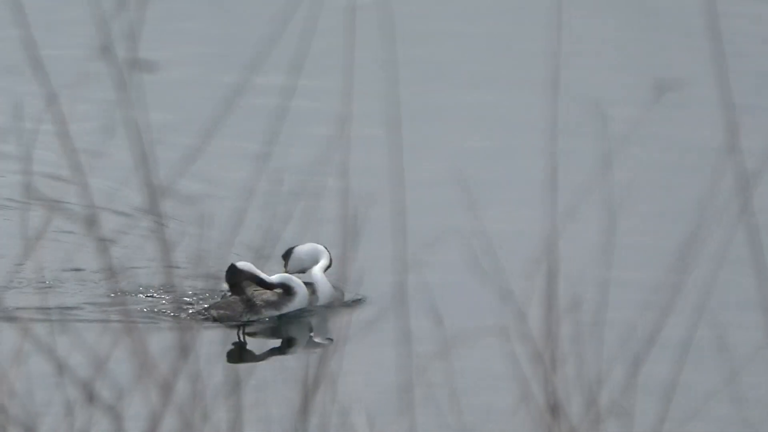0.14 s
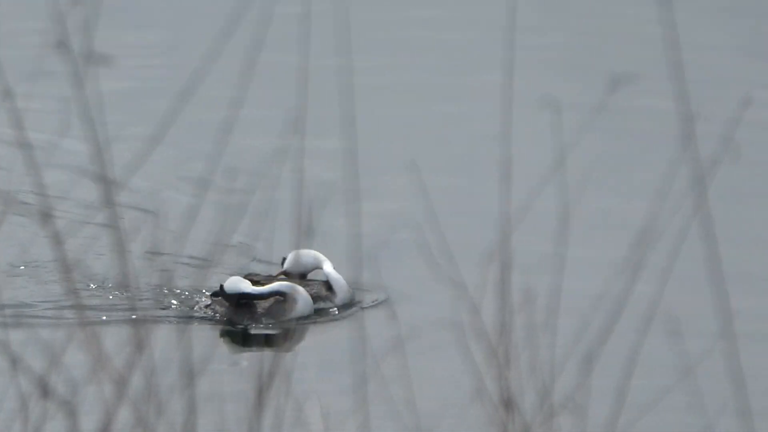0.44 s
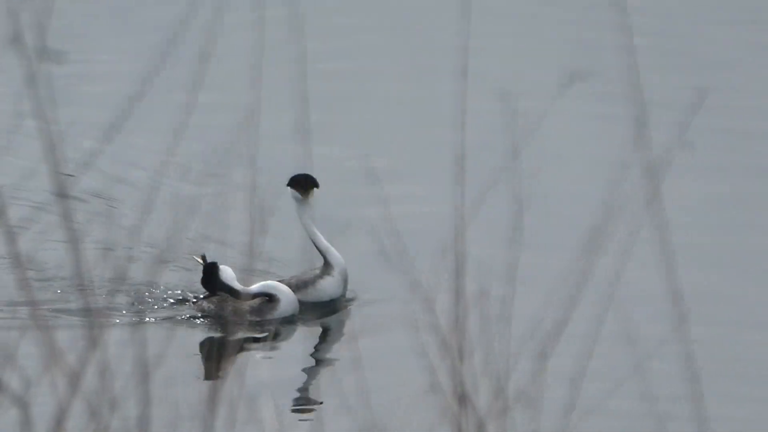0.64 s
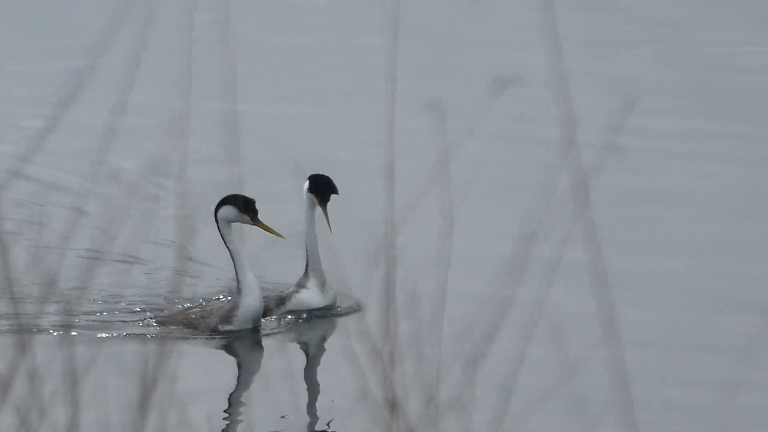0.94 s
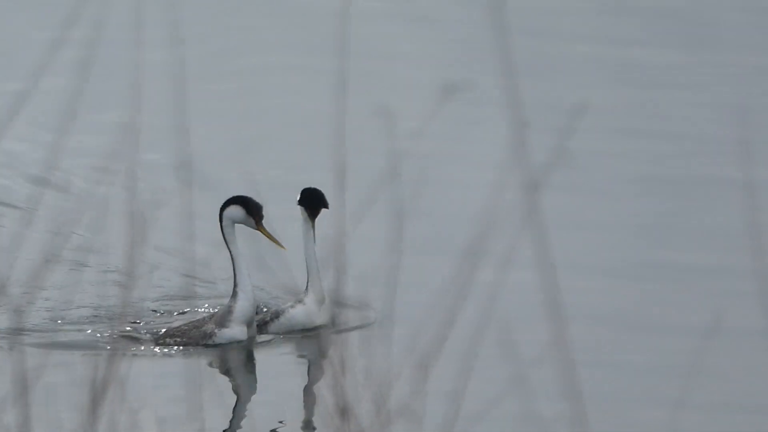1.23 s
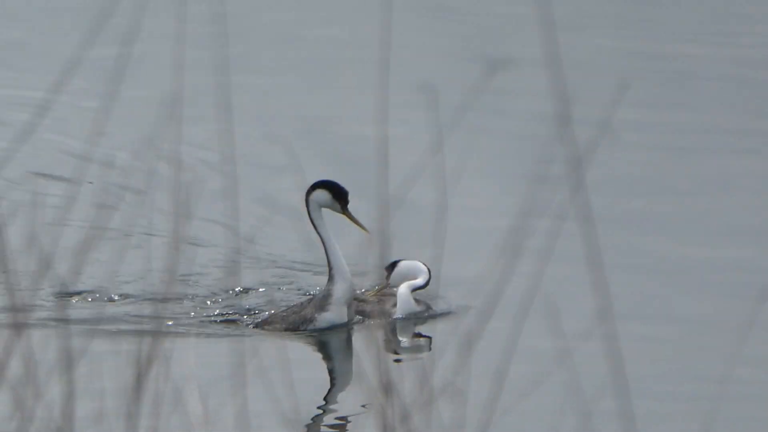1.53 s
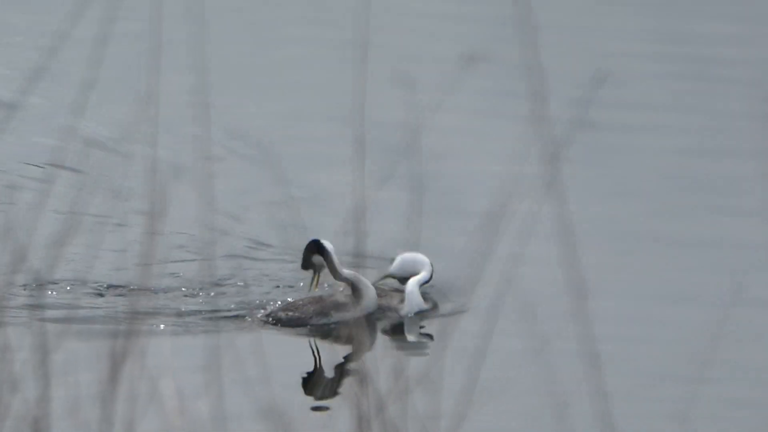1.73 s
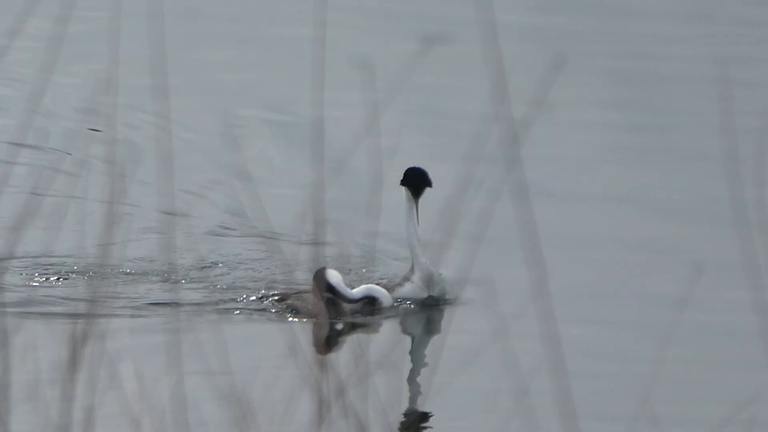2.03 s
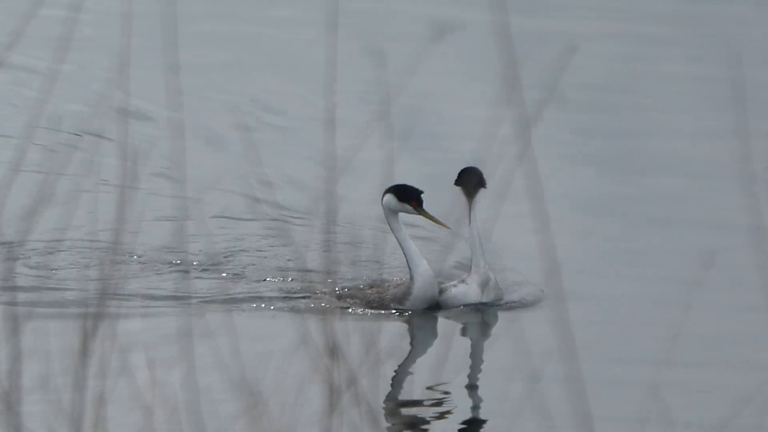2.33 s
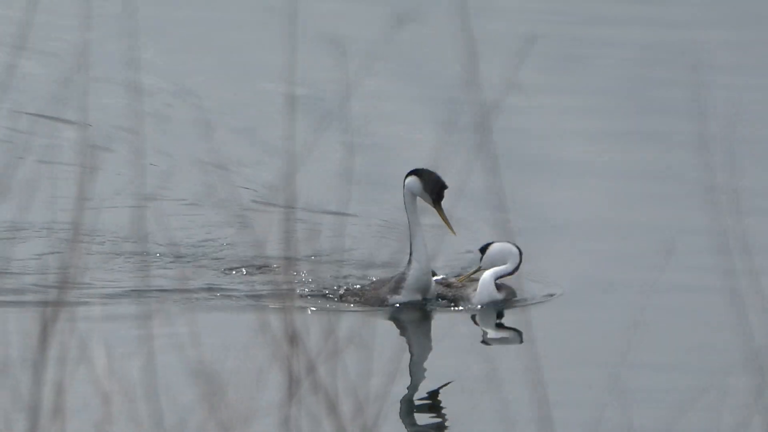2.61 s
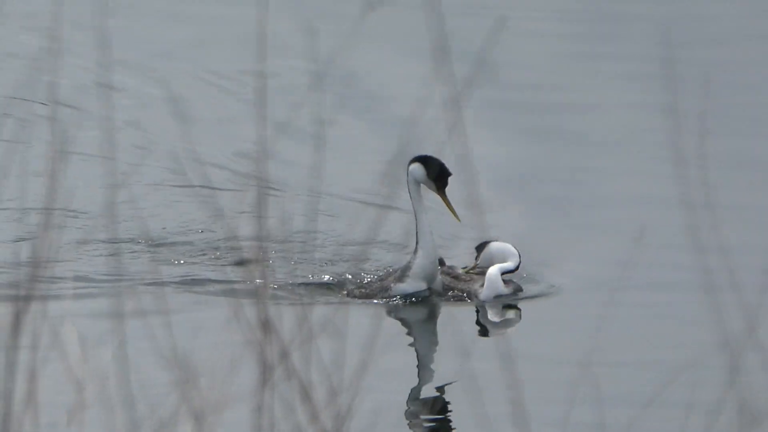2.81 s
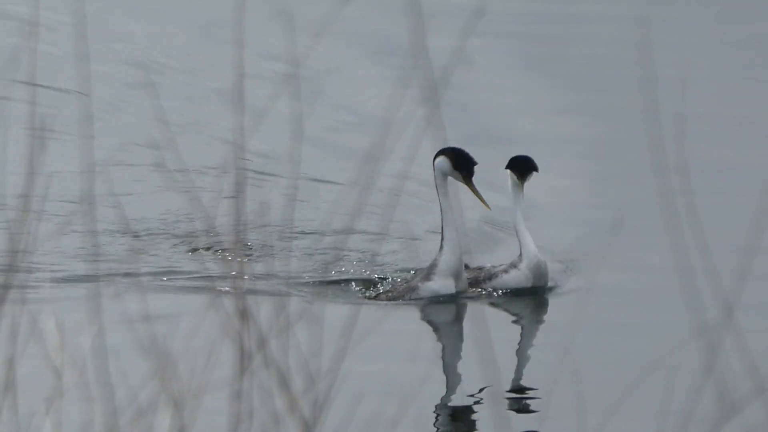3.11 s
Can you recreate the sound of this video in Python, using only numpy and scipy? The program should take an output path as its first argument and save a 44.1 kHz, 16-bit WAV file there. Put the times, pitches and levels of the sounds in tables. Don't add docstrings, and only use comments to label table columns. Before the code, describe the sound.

Waterbirds call from the left of a calm pond: chips at 0.6-0.75 s, a fast pulsed two-voiced trill from 0.85 s, swelling into a rough, high whistle at 1.15-1.37 s, then chips until 1.5 s. Faint pips follow at 2.7-2.9 s. Wavelets slap near 0.46, 1.5, 2.1, 2.65 and 3.16 s, some with ringing drops. Faint distant chirps, light echo, low wavering rumble and steady hiss.

```python
import sys
import numpy as np
from scipy import signal
from scipy.fft import rfft, irfft
from scipy.io import wavfile
from scipy.ndimage import uniform_filter1d

SR = 44100
rng = np.random.default_rng(int(sys.argv[2]) if len(sys.argv) > 2 else 0)


def unload_audio(sound):
    columns = np.transpose(np.atleast_2d(sound))
    steps = np.round(np.clip(columns, -1, 1) * 32767)
    wavfile.write(sys.argv[1], SR, steps.astype(np.int16))


def how_loud(loudness_db):
    steps = np.asarray(loudness_db, float) / 20
    return 10 ** steps


N = 143766
SPLIT_HZ = 2900


def evened(x):
    return x / np.sqrt(np.mean(x ** 2) + 1e-20)


def read(points, hz):
    f, value = np.transpose(points)
    return np.interp(np.log(hz + 1), np.log(f + 1), value, left=value[0], right=value[-1])


def add(mix, start_s, sound):
    part = mix[round(start_s * SR):][:len(sound)]
    part += sound[:len(part)]


def resonate(x, hz, width_hz):
    turn = np.exp(2j * np.pi * hz * np.arange(x.shape[-1]) / SR)
    r = np.exp(-np.pi * width_hz / SR)
    return 2 * (turn * signal.lfilter([1 - r], [1, -r], x / turn)).real


def resonate_twice(x, hz, width_hz):
    return resonate(resonate(x, hz, width_hz), hz, width_hz)


def drift(count, smooth_s):
    wide = max(round(smooth_s * SR), 2)
    smooth = uniform_filter1d(uniform_filter1d(rng.standard_normal(count), wide), wide)
    return smooth * np.sqrt(wide * 3 / 2)


# frequency in Hz, correlation.
CHANNEL_LIKENESS = [(25, 0), (60, 0.092), (130, 0.56), (290, 0.09), (600, 0.16), (3100, 0.09), (7000, 0.63),
                    (15000, 0.24)]
# frequency in Hz, difference in dB.
AIR_TILT = [(30, -7), (120, 2), (700, 2), (2400, 3.5), (8000, -1.5)]


def air(colour_db, patchy_db):
    frames, hz = N // 256 + 5, np.fft.rfftfreq(1024, 1 / SR)
    a, b, c, d, patches = rng.standard_normal((frames, 513, 5)).T
    patches = uniform_filter1d(patches, size=10, axis=0)
    patches = evened(uniform_filter1d(patches, size=12, axis=1))
    same = np.clip(read(CHANNEL_LIKENESS, hz), -1, 1)[:, None]
    left = a + 1j * b
    right = same * left + np.sqrt(1 - same ** 2) * (c + 1j * d)
    side_db = np.outer([.5, -.5], read(AIR_TILT, hz))[..., None]
    z = np.array([left, right]) * how_loud(colour_db(hz)[:, None] + patchy_db * patches + side_db)
    out = signal.istft(z, nperseg=1024, noverlap=768)[1][:, :N]
    return out / np.sqrt(np.mean(out.mean(0) ** 2))


# frequency in Hz, level in dB.
LOW_AIR_COLOUR = [(25, -46), (60, -18), (115, -4.5), (330, -5.5), (700, -6), (1600, -19), (2200, -17),
                  (2900, -28)]
# frequency in Hz, level in dB.
HISS_COLOUR = [(2900, -8), (3350, 4), (4500, -4.5), (6300, -6.5), (7800, -10.5), (9800, -8.5),
               (14800, -18.5), (15800, -18)]


def still_air():
    low = air(lambda hz: np.where(hz <= SPLIT_HZ, read(LOW_AIR_COLOUR, hz), -100), patchy_db=1.0)
    hiss = air(lambda hz: np.where(hz > SPLIT_HZ, read(HISS_COLOUR, hz), -100), patchy_db=1.5)
    return how_loud(-50.5) * low + how_loud(-63.5) * hiss


# time in seconds, first swell in dB, second swell in dB.
RUMBLE_SWELLS = [(0, -45.5, -36.5), (.25, -46, -42.5), (.45, -46.5, -47.5), (.7, -49.5, -47),
                 (.9, -44, -52.5), (1.15, -44, -43), (1.419, -42, -41.5), (1.6, -44.5, -48.5),
                 (1.8, -48.5, -42.5), (2.0, -44.5, -57.5), (2.3, -50.5, -48.5), (2.5, -48, -49.5),
                 (2.7, -50, -52.5), (2.95, -46.5, -52.5), (3.26, -50, -58)]
# centre in Hz, width in Hz, level in dB, which swell (1 or 2).
HUM_BANDS = [
    (129.4, 60, -2.5, 1),
    (162.9, 48.5, 1.5, 1),
    (263.6, 60.7, 2.5, 2),
    (386, 62, -13.5, 2),
]


def rumble():
    t, swells, out = np.arange(N) / SR, np.transpose(RUMBLE_SWELLS), np.zeros((2, N))
    for hz, width_hz, db, swell in HUM_BANDS:
        noise = rng.standard_normal(N) + 0.26 * rng.standard_normal((2, N))
        noise = np.array([noise[0], np.roll(noise[1], 6)])
        level = how_loud(np.interp(t, swells[0], swells[round(swell)]) + db)
        out += level * evened(resonate_twice(noise, hz, width_hz))
    return signal.lfilter(*signal.butter(3, 85, "high", fs=SR), out)


# frequency in Hz, level in dB.
SLAP_SPECTRUM = [(450, 7), (800, 1.5), (1400, 2.5), (2100, -0.5), (2900, -19.5), (3600, -11.5), (5500, -21),
                 (9500, -51)]
# middle in seconds, length in seconds, level in dB, spray in dB.
WAVELETS = [
    (0.46, 0.12, -48.5, 2.5),
    (0.994, 0.63, -59.5, 10.5),
    (1.528, 0.16, -52, 6.5),
    (2.059, 0.033, -47.5, 2),
    (2.098, 0.041, -50, 1),
    (2.634, 0.039, -45, 2),
    (2.666, 0.041, -46, 4),
    (3.16, 0.15, -53, -2),
]


def slaps():
    grains_per_s, spread_db, wash = 2600, 3.2, .25
    hit = rng.random(N) < grains_per_s / SR
    size = how_loud(spread_db * np.minimum(rng.exponential(1, N), 3.2)) * hit
    grains = rng.standard_normal((2, N)) * (wash + size)
    hz, t, out = np.fft.rfftfreq(N, 1 / SR), np.arange(N) / SR, np.zeros((2, N))
    low_cut = np.minimum(hz / SLAP_SPECTRUM[0][0], 1) ** 3
    z = rfft(grains + .5 * grains[::-1]) * how_loud(read(SLAP_SPECTRUM, hz)) * low_cut
    whole, spray = irfft(z, N), irfft(z * (hz > SPLIT_HZ), N)
    for middle_s, length_s, db, spray_db in WAVELETS:
        swell = np.exp(-((t - middle_s) / (.45 * length_s)) ** 2)
        out += how_loud(db) * swell * (whole + (how_loud(spray_db) - 1) * spray)
    return how_loud([[1.5], [-1.5]]) * out / np.std(whole)


GRIT, WOBBLE, GLIDE = .22, .012, .07
FLUTTER, PULSE_OCTAVE_DB = .4, -31


def note(db, hz, hold_s, rise_s, t60_s, octave_db, glide=0, sag_db_per_s=0, flutter=0, wobble=0):
    t = np.arange(round(hold_s * SR) + 1500) / SR
    pitch = hz * (1 + glide * (np.minimum(t / .006, 1) - .5) + wobble * drift(len(t), .003))
    phase = 2 * np.pi * (np.cumsum(pitch) / SR + rng.random())
    flutter_hz = 200 * (1 + 0.34 * drift(len(t), 0.0024))
    beat = 1 + flutter * np.cos(2 * np.pi * np.cumsum(flutter_hz) / SR)
    rise = np.sin(np.pi / 2 * np.minimum(t / rise_s, 1)) ** 2
    shape = rise * how_loud(db + sag_db_per_s * t - 60 * np.maximum(t - rise_s - hold_s, 0) / t60_s)
    grit = 1 + GRIT * drift(len(t), .001)
    return np.sqrt(2) * shape * beat * grit * (np.sin(phase) + how_loud(octave_db) * np.sin(2 * phase))


# start in seconds, peak in dB, pitch in Hz.
PLIPS = [(0.443, -42, 894), (0.461, -46, 1000), (0.474, -35.5, 1280), (.4965, -48, 3600), (.521, -47, 1150),
         (1.939, -53, 1600), (2.062, -44.5, 1700), (2.0697, -47, 2010), (2.0880, -40.5, 1210),
         (2.0892, -52, 3830), (2.096, -40, 1600), (2.107, -42, 1100), (2.622, -50, 2500),
         (2.635, -44, 2000), (2.643, -47, 1500), (2.665, -49, 1900)]


def drops():
    out = np.zeros(N)
    for s, db, hz in PLIPS:
        add(out, s, note(db, hz, 0, .0006, .009, PULSE_OCTAVE_DB, GLIDE, wobble=WOBBLE))
    return how_loud([[2.5], [-2.5]]) * out


# start in seconds, peak in dB, pitch in Hz, hold in seconds.
DISTANT_CHIRPS = [
    (0.214, -60, 2124, 0.037),
    (.413, -63, 1800, 0.0071),
    (0.417, -60.5, 3720, 0.022),
    (0.546, -62, 3760, .01),
    (1.75, -62, 3280, 0.0085),
    (1.85, -66, 3800, 0.0068),
    (1.872, -77, 3420, 0.018),
    (1.909, -68, 3300, .005),
    (2.791, -68, 3400, .01),
    (2.81, -69, 4230, .015),
]


def far_chirps():
    out = np.zeros(N)
    for s, db, hz, hold_s in DISTANT_CHIRPS:
        add(out, s, note(db, hz, hold_s, .0013, 0.015, PULSE_OCTAVE_DB, wobble=WOBBLE))
    return out


# start in seconds, peak in dB, pitch in Hz.
CHIP_NOTES = [(.602, -41, 2046), (.635, -40.5, 2120), (.649, -45, 2160), (.6724, -38.5, 2120),
              (0.726, -37.5, 2074), (.740, -53.5, 2280), (1.4026, -36.5, 2120), (1.4421, -38.5, 2100),
              (1.4908, -42, 1745), (1.4933, -37.5, 2010), (1.4999, -38.5, 2230)]


def chips():
    out = np.zeros(N)
    for s, db, hz in CHIP_NOTES:
        add(out, s, note(db, hz, .0013, .0011, .01, -9.5, GLIDE, wobble=WOBBLE))
    return out + how_loud(3) * resonate(out, hz=2370, width_hz=91)


# start in seconds, peak in dB, pitch in Hz, hold in seconds.
LOWER_PIPS = [(.851, -39.5, 2159, 0.013), (0.894, -40, 2020, 0.0018), (0.942, -38, 2186, 0.003),
              (0.967, -43.5, 2050, 0.0078), (0.991, -43, 2070, 0.0027), (1.013, -45, 2034, 0.01),
              (1.038, -34.5, 2155, 0.0023), (1.065, -55, 2000, .002), (1.071, -46, 1980, 0.0018),
              (2.682, -43.5, 2110, 0.0011), (2.7305, -39.5, 2060, 0.0012), (2.7405, -41.5, 2200, 0.00046),
              (2.828, -57, 2190, 0.001778), (2.909, -46.5, 2140, 0.00086), (2.914, -44.5, 2150, 0.001),
              (2.918, -47, 2110, 0.00081)]
# time in seconds, pitch in Hz, level in dB.
WHISTLE_BREATHS = [
    [(1.147, 2140, -41), (1.154, 2110, -41), (1.164, 2020, -38), (1.168, 2030, -53), (1.171, 2090, -37),
     (1.175, 2080, -52)],
    [(1.177, 2187, -33), (1.195, 2194, -53), (1.204, 2170, -36), (1.217, 2007, -45), (1.2205, 2060, -37),
     (1.224, 2060, -50)],
    [(1.225, 2146, -35), (1.245, 2165, -38.5), (1.258, 2070, -41.5), (1.269, 2040, -38)],
    [(1.272, 2146, -36), (1.300, 2173, -36), (1.311, 2096, -39), (1.334, 2106, -36.5), (1.362, 2068, -39.5),
     (1.374, 2160, -35)],
]


def whistle(rows):
    s, hz, db = np.transpose(rows)
    t = np.arange(s[0], s[-1], 1 / SR)

    def shimmer(smooth_s):
        return 1 + .4 * drift(len(t), smooth_s)

    pitch = np.interp(t, s, hz) * (1 + 0.0055 * drift(len(t), 0.0018))
    phase = 2 * np.pi * np.cumsum(pitch) / SR
    edge = np.clip(np.minimum(t - s[0], s[-1] - t) / 0.0026, 0, 1)
    settled = np.clip((t - 1.30) / .01, 0, 1)
    half_line = how_loud(-18.5) * settled * shimmer(.004) * np.sin(3 * phase / 2)
    twelfth = how_loud(-33.5) * (1 + settled) / 2 * shimmer(.003) * np.sin(3 * phase)
    octave = how_loud(-13) * shimmer(0.0013) * np.sin(2 * phase)
    tone = how_loud(np.interp(t, s, db)) * (np.sin(phase) + octave + twelfth + half_line)
    return s[0], np.sqrt(2) * edge * (1 + .15 * drift(len(t), 0.00099)) * tone, phase


def lower_voice():
    out, phase = np.zeros((2, N))
    for s, db, hz, hold_s in LOWER_PIPS:
        add(out, s, note(db, hz, hold_s, .0013, .011, -31, flutter=FLUTTER / 3, wobble=.004))
    for rows in WHISTLE_BREATHS:
        s, tone, turning = whistle(rows)
        add(out, s, tone)
        add(phase, s, turning)
    return out, phase


# peak time in seconds, peak in dB, pitch in Hz.
UPPER_STROKES = [(1.1564, -48, 2400), (1.1636, -48, 2400), (1.1718, -38, 2300), (1.1741, -52, 2350),
                 (1.1780, -28, 2420), (1.1837, -29.5, 2370), (1.188, -35.5, 2450), (1.1926, -31, 2430),
                 (1.1975, -41, 2380), (1.2002, -29.5, 2390), (1.2040, -36, 2460), (1.2076, -42, 2420),
                 (1.2132, -50, 2340), (1.2212, -37, 2280), (1.2273, -32, 2430), (1.2340, -34, 2350),
                 (1.24, -31.5, 2425), (1.2458, -36, 2370), (1.2519, -46, 2350), (1.2577, -49, 2350),
                 (1.2656, -42, 2270), (1.2724, -32.5, 2400), (1.2764, -32.5, 2440), (1.2800, -41, 2420),
                 (1.2841, -35.5, 2370), (1.2884, -54, 2420), (1.2902, -41, 2400), (1.2956, -36, 2330),
                 (1.3030, -44, 2380), (1.31, -46, 2330), (1.3214, -48, 2320), (1.3395, -46, 2370),
                 (1.3445, -48, 2306), (1.3520, -52, 2330), (1.3577, -47, 2350), (1.3626, -37, 2300),
                 (1.3691, -32, 2360), (1.375, -30.5, 2400), (1.3789, -38, 2620)]
STROKE_GAP_LIMITS_S = (.0035, .0065)


def strokes(phase):
    gaps_s = np.gradient(np.array(UPPER_STROKES)[:, 0])
    out, widths_s = np.zeros(N), .42 * np.clip(gaps_s, *STROKE_GAP_LIMITS_S)
    for (s, db, hz), width_s in zip(UPPER_STROKES, widths_s):
        t = np.arange(-3 * width_s, 3 * width_s, 1 / SR)
        tone = np.sin(phase[round(s * SR)] + 2 * np.pi * hz * t)
        tone = tone * (1 + GRIT / 2 * drift(len(t), .001))
        add(out, s + t[0], np.sqrt(2) * how_loud(db) * np.exp(-(t / width_s) ** 2) * tone)
    return out


# start in seconds, peak in dB, pitch in Hz, hold in seconds.
TRILL_PULSES = [(0.844, -43, 2420, 0.0029), (0.849, -31.5, 2385, 0.019), (0.895, -31.5, 2350, 0.0014),
                (0.898, -35, 2400, 0.003), (.937, -33, 2260, 0.0005), (0.9423, -31.5, 2350, 0.0048),
                (0.985, -29, 2220, 0.00049), (0.988, -26.5, 2370, 0.007), (1.031, -31.5, 2120, 0.0012),
                (1.0366, -30, 2370, 0.012), (1.061, -43, 2340, 0.0036), (1.072, -36, 2380, 0.0015),
                (1.082, -35, 2350, 0.0018), (1.104, -42, 2380, 0.0027), (1.11, -33, 2210, 0.0024),
                (1.1195, -27, 2330, .002), (1.1276, -26.5, 2340, 0.0017), (1.1324, -32, 2450, 0.0027),
                (1.1355, -34, 2320, 0.0022), (0.686, -33, 2310, 0.0014), (0.953, -43, 2420, .002),
                (0.9644, -36, 2330, 0.0023), (1.089, -43, 2460, 0.0033)]


def upper_voice(phase):
    out = np.zeros(N)
    for s, db, hz, hold_s in TRILL_PULSES:
        add(out, s, note(db - 5.5, hz, hold_s, .0013, .009, PULSE_OCTAVE_DB, glide=WOBBLE,
                         sag_db_per_s=-150, flutter=FLUTTER, wobble=WOBBLE))
    return out + strokes(phase)


def bank_scatter(dry):
    t = np.arange(SR // 3) / SR
    sparse = rng.random((2, len(t))) < .05
    tail = rng.standard_normal((2, len(t))) * sparse * how_loud(-60 * t / .3) * (t > .003)
    return signal.fftconvolve(dry[None], tail / np.linalg.norm(tail[0]), axes=1)[:, :N]


BIRD_LEFT_RIGHT_DB = (5, -11)


def birds():
    sum_hz, cubic_hz, dip_width_hz = 4340, 6700, 500
    lower, phase = lower_voice()
    upper = upper_voice(phase)
    sum_tone = resonate_twice(upper * lower, sum_hz, 900)
    cubic = resonate_twice(upper * upper * (upper + lower), cubic_hz, 1000)
    dry = chips() + upper + lower + how_loud(17.5) * sum_tone + how_loud(34.5) * cubic
    dry = dry - resonate(dry, 3000, dip_width_hz)
    treble = resonate_twice(dry, sum_hz, 3 * dip_width_hz)
    scatter = bank_scatter(dry)
    direct = how_loud(np.array(BIRD_LEFT_RIGHT_DB))[:, None] * dry
    near_bank = how_loud(-18.5 + np.array([[3.], [-4.]])) * scatter
    far_bank = how_loud(-31) * np.roll(scatter, round(.4 * SR), axis=1)
    right_treble = how_loud(-7.5) * np.array([[0], [1]]) * treble
    return direct + near_bank + far_bank + far_chirps() + right_treble


def scene():
    return still_air() + rumble() + slaps() + drops() + birds()


def top_cut(x):
    return signal.sosfilt(signal.butter(12, 15990, fs=SR, output="sos"), x)


def record(dry):
    edge_hz = 15720
    limited = irfft(rfft(dry) * (np.fft.rfftfreq(N, 1 / SR) < edge_hz), N)
    return top_cut(limited)


dry = scene()
out = record(dry)
unload_audio(out)
```